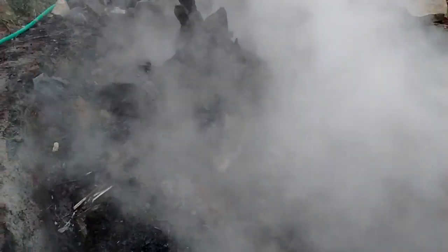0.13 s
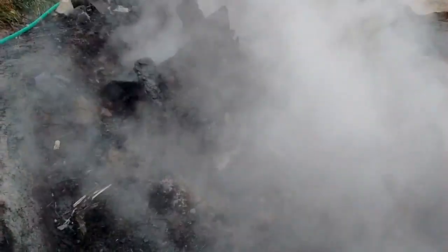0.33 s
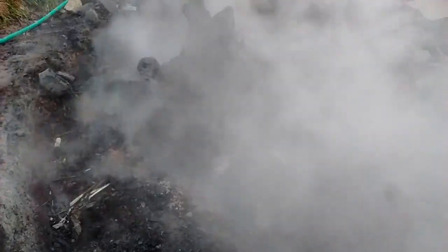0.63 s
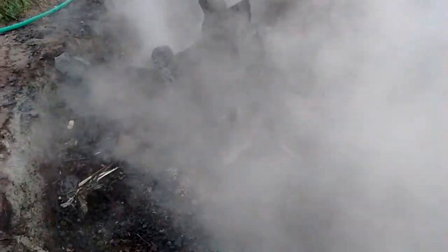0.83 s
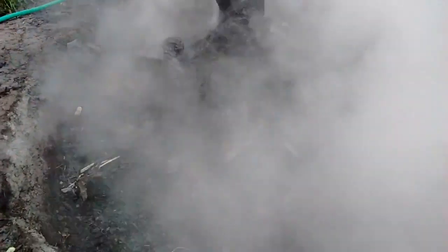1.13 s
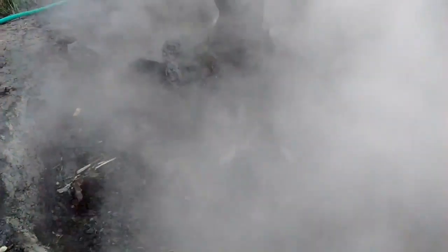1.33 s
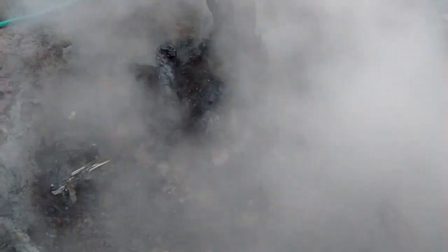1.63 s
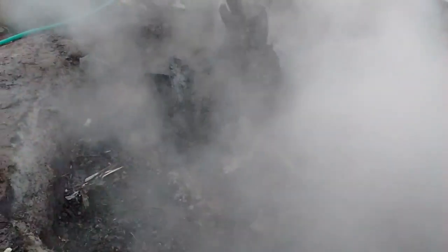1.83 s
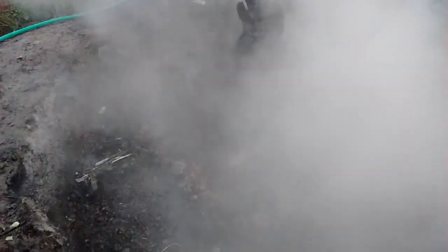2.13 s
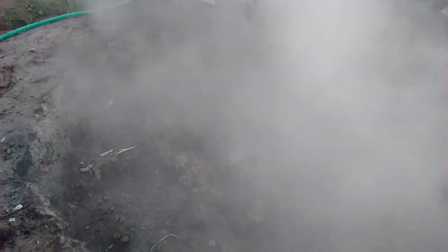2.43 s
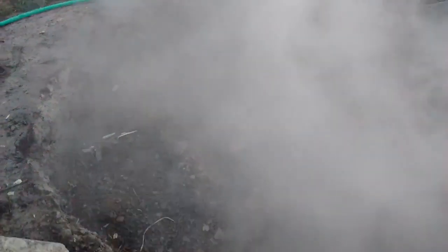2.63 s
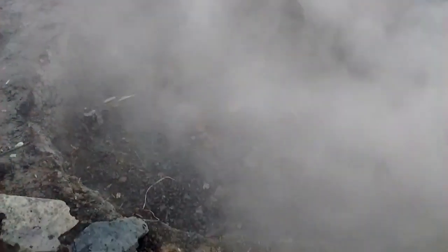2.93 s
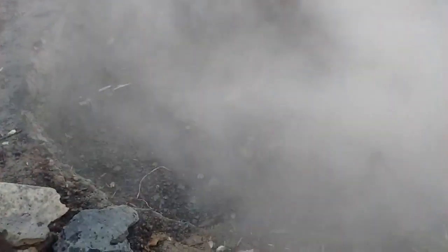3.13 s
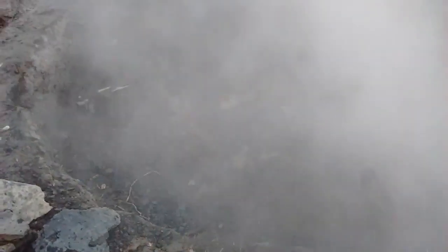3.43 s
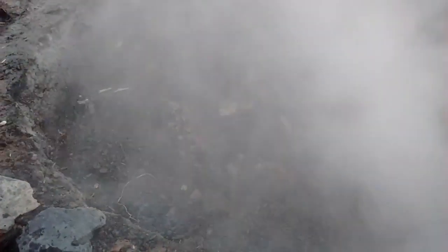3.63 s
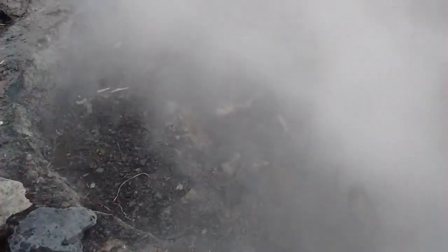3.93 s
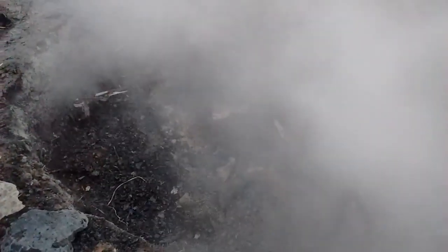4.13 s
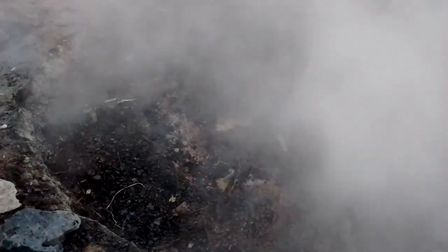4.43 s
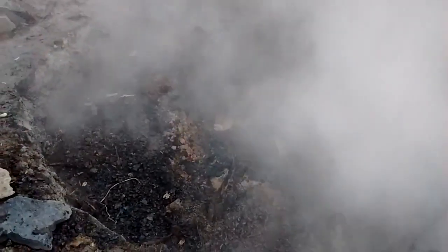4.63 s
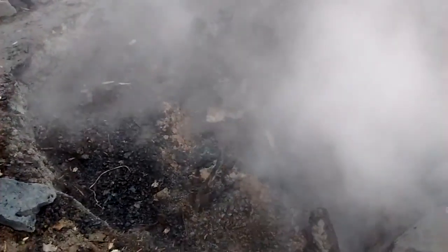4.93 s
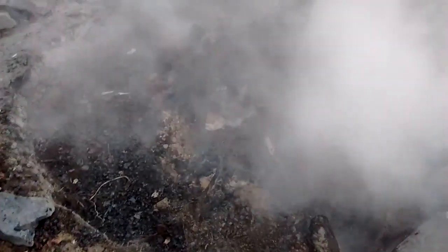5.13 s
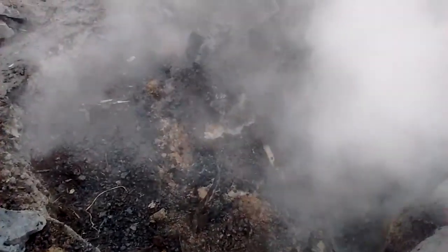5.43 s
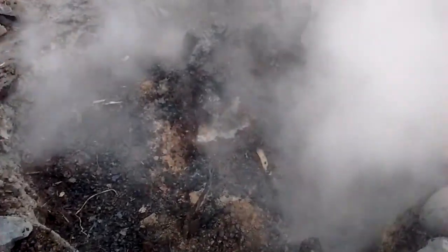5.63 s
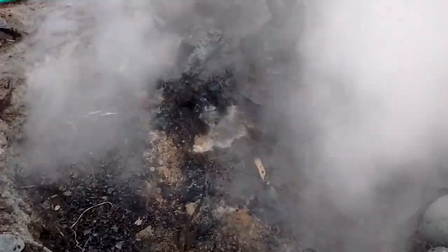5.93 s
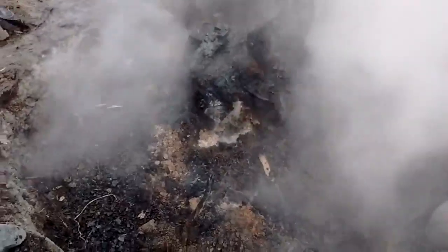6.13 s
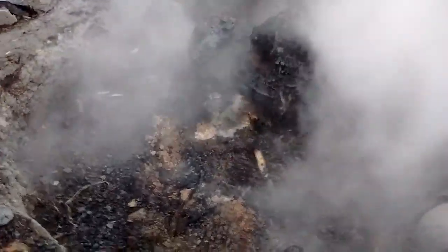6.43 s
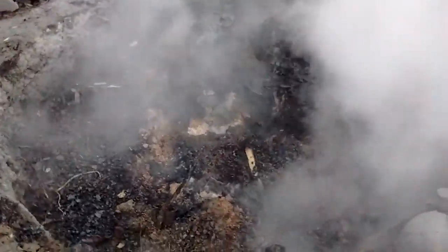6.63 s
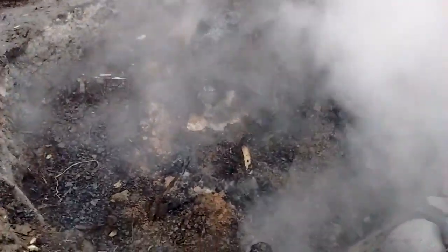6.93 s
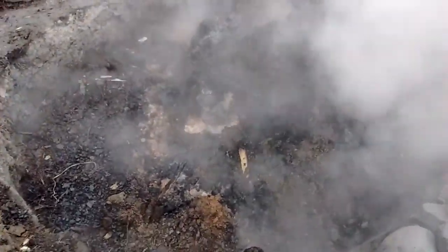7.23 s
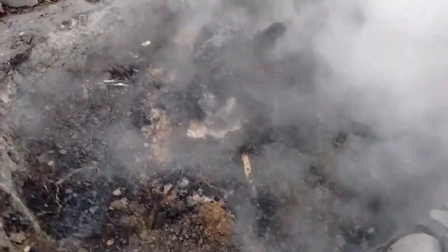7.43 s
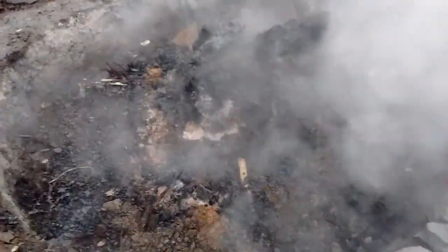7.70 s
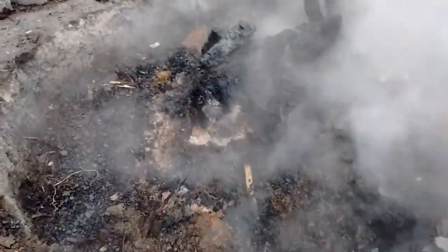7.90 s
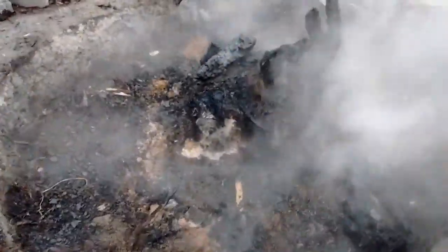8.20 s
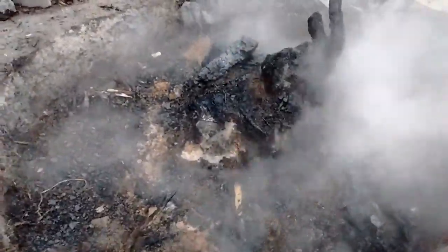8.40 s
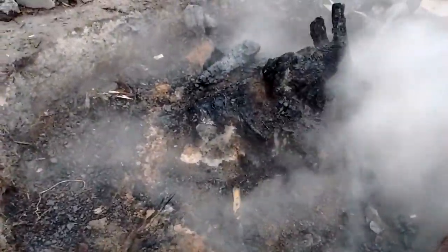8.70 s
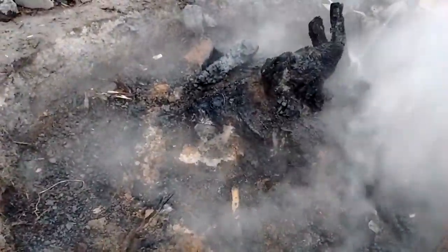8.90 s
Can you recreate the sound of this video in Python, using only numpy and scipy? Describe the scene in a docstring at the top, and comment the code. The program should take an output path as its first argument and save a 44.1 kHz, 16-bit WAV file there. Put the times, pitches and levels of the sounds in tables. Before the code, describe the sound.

Steam hisses continuously as a jet of water sweeps over smouldering wood, surging in short spurts with tiny crackles and pops. Boiling water rumbles underneath. Gusts thump the hand-held microphone in the open air, mostly on the left and mainly in the first half, while the char whistles faintly. A dull drone passes briefly, then the sizzling swells slightly with a few more spits.

```python
"""A hose jet sweeps over hot charred wood and flashes into hissing, spitting steam above a low boiling rumble.
A cavity in the char whistles faintly, and a dull drone comes and goes in the rumble.
Heard outdoors from a hand-held camera: wind buffets and thumps its two microphone ports, and its gain
control ducks after loud thumps. Each channel takes its own port minus a delayed share of the other,
which combs and widens the stereo."""
import sys
import numpy as np
from scipy import signal
from scipy.fft import rfft, irfft, next_fast_len
from scipy.io import wavfile
from scipy.ndimage import uniform_filter1d

SR = 44100
rng = np.random.default_rng(int(sys.argv[2]) if len(sys.argv) > 2 else 0)


def pcm_store(signal):
    """Save signal as 16-bit PCM."""
    levels = np.round(np.clip(np.atleast_2d(signal), -1, 1) * 32767)
    wavfile.write(sys.argv[1], SR, levels.astype(np.int16).T)


N = 399546


def gain_of(db):
    """Decibels to a factor."""
    return 10 ** (np.asarray(db) / 20)


def unit_rms(x):
    """Scales to rms 1."""
    return x / np.sqrt(np.mean(abs(x) ** 2) + 1e-20)


def at_hz(table, hz):
    """Columns of a spectrum table at the given frequencies."""
    f, *columns = np.transpose(table)
    return np.array([np.interp(np.log(hz + 1), np.log(f + 1), c) for c in columns])


def at_time(table, t):
    """Columns of a curve table at the given times."""
    s, *columns = np.transpose(table)
    return np.array([np.interp(t, s, c) for c in columns])


def coloured(spectrum):
    """Steady noise with the given spectrum, at rms 1."""
    size = next_fast_len(N)
    colour = gain_of(at_hz(spectrum, np.fft.rfftfreq(size, 1 / SR))[0])
    return unit_rms(irfft(rfft(rng.standard_normal(N), size) * colour, size)[:N])


def wander(samples):
    """Slow random drift at rms 1, smoothed twice over that many samples."""
    return unit_rms(uniform_filter1d(uniform_filter1d(rng.standard_normal(N), samples), samples))


def mottle(shape, bins, frames):
    """Random patches over frequency and time, at rms 1."""
    across = uniform_filter1d(rng.standard_normal(shape), bins, axis=0)
    return unit_rms(uniform_filter1d(across, frames, axis=1))


def spell(start, length, fade_s):
    """Fades in before the start, holds for the length, then fades out."""
    t = np.arange(N) / SR
    return np.clip(np.minimum(t - start, start + length - t) / fade_s + 1, 0, 1) ** 2


def fuzzy_tone(spells, width_hz, fade_s, waver_hz):
    """Noise in a narrow, wavering resonance that sounds in spells."""
    pole = np.exp(-np.pi * width_hz / SR)
    noise = rng.standard_normal(N) + 1j * rng.standard_normal(N)
    narrow = unit_rms(signal.lfilter([1], np.convolve([1, -pole], [1, -pole]), noise))
    narrow *= np.exp(2j * np.pi * np.cumsum(waver_hz * wander(samples=3000)) / SR)
    envelope, phase, t = np.sqrt(2) * abs(narrow), np.angle(narrow), np.arange(N) / SR
    return sum(gain_of(db) * spell(s, length, fade_s) * envelope * np.cos(phase + 2 * np.pi * hz * t)
               for s, length, hz, db in spells)


def on_ports(sound, right):
    """Whole on the left port, scaled on the right; a negative share is in opposite phase."""
    return sound * np.array([[1], [right]])


def add_centred(mix, s, sound):
    """Mixes a sound in, centred on a time."""
    start = max(round(s * SR) - sound.shape[1] // 2, 0)
    part = mix[:, start:start + sound.shape[1]]
    part += sound[:, :part.shape[1]]


# Three spots on the wood, as heard from the camera. Each row: frequency in Hz, left and right port
# spectrum in relative dB, likeness of the ports in phase, and their likeness a quarter cycle apart.
FIRST_SPOT = [(350, -6.5, -7, -0.91, -0.037), (597, -5, -8.5, -0.89, 0.37), (1230, -6, -11.5, -0.62, 0.31),
              (1880, -3.5, -5.5, -0.84, 0.51), (2630, -3.5, -9, -0.21, 0.22), (3000, -2.5, -6.5, -0.27, .2),
              (3930, -2.5, -7.5, -0.62, 0.22), (5300, -8.5, -9, -0.51, 0.54), (5750, -11, -8, -.4, 0.69),
              (6200, -15, -8.5, -0.41, 0.56), (8100, -5.5, -4.5, -0.41, -0.14),
              (10240, -9, -9, 0.088, 0.37), (11500, -11, -19, 0.092, 0.02), (13100, -14, -26, -0.03, 0.05),
              (15400, -12, -31, -0.81, 0.09), (16100, -28, -20, 0.44, 0.03)]
SECOND_SPOT = [(350, -9.5, -11.5, -0.92, -0.42), (643, -3, -7, -0.98, 0.42),
               (1200, -8.5, -13, -0.74, -0.18), (1670, -5.5, -7.5, -0.94, 0.12),
               (2410, -1, -4.5, -0.71, 0.17), (3170, -10.5, -2.5, -0.86, -1.33),
               (4370, -9.5, -10.5, -0.55, -0.83), (5500, -10.5, -19, -0.34, -0.87),
               (8200, -12.5, -9, 0.011, -0.27), (10500, -13.5, -16, -0.04, 0.14),
               (11550, -16, -23, -0.056, -0.09), (13100, -19, -32, -0.05, -0.01),
               (15200, -19, -37, 0.21, 0.01), (16500, -21.5, -28, 0.71, -0.01)]
THIRD_SPOT = [(360, -12.5, -11, -0.86, -0.31), (594, -8, -10, -0.85, -0.053),
              (1150, -7.5, -10.5, -0.71, -0.47), (1810, -7.5, -8.5, -0.76, -0.25),
              (2150, -2.5, -6, -0.68, -0.39), (2400, -5.5, -9, 0.21, -0.1), (2940, -7, -9, 0.48, -0.68),
              (3200, -5.5, -7.5, 0.48, -0.77), (3850, -10.5, -6, 0.39, -1.4), (4460, -8, -7.5, .3, -.35),
              (5370, -7.5, -11, 0.62, -0.08), (7900, -7, -3.5, 0.022, 0.18),
              (8600, -7.5, -1.5, -0.087, 0.32), (9700, -7.5, -6, 0.1, 0.36),
              (11500, -9, -14.5, 0.11, -0.03), (13000, -12, -24.7, -0.05, 0.08),
              (14600, -10.5, -31, -0.07, 0.01), (16100, -10, -27.1, -0.052, -0.08)]
# The jet's path over the wood. Each row: time in seconds, position from 0 (first spot) to 2 (third).
JET_PATH = [(0, 0.09), (2.0, 0.046), (5, 0.99), (6.1, 1.25), (6.5, 1.89), (9.06, 2.01)]


def spot_colour(hz, t):
    """Each spot colours the hiss its own way, and the sweeping jet blends one into the next."""
    aim = np.clip(at_time(JET_PATH, t)[0], 0, 2)
    weights = np.maximum(1 - abs(aim - np.arange(3)[:, None]), 0)
    spots = np.array([at_hz(spot, hz) for spot in (FIRST_SPOT, SECOND_SPOT, THIRD_SPOT)])
    left_treble = (gain_of(spots[:, :1, hz > 3500]) ** 2).sum(2, keepdims=True) / len(hz)
    spots[:, :2] -= 10 * np.log10(left_treble)  # all spots equally loud in the left port's treble
    left_db, right_db, in_phase, quarter = np.einsum("kcf,kt->cft", spots, weights)
    likeness = in_phase + 1j * quarter
    likeness /= np.maximum(abs(likeness) / .99, 1)
    return left_db, right_db, likeness


# The jet on the char. Each row: time in seconds, hiss level in dB, boiling and splash boosts in dB.
JET_LEVELS = [(0.0, -30.5, -3, 1), (0.45, -29.5, 0, -1), (0.78, -32.5, -4.5, 3), (0.91, -30, -3, -2.5),
              (1.24, -31, -2, -0.5), (1.92, -31, 1.5, 1.5), (2.5, -34.5, 0, 4), (2.95, -35, -1.5, 3),
              (3.15, -32.5, -0.5, 0), (3.4, -32.5, -0.5, 4), (3.7, -31.5, -1, 0), (4.1, -32.5, -2.5, 0),
              (4.41, -30, -4.5, -2), (4.85, -32, -6.5, -1), (5.3, -31.5, -4.5, 1), (5.8, -31, -3.5, 2),
              (6.23, -31.5, -3, 3), (6.58, -27.5, 2.5, -1), (6.82, -31.5, 2.5, 2), (7.06, -26.5, 3.5, -2),
              (7.2, -30, 0, -1.5), (7.4, -28, 0, -1.5), (7.75, -29, 5.5, 3.5), (7.85, -28.5, 6, 6.5),
              (7.92, -27.5, 0, -2.5), (8.13, -31, 5.5, 2.5), (8.38, -28.5, 2.5, 2), (8.7, -28, 3, -2.5),
              (8.9, -28.5, 1.5, -5.5), (9.06, -28.5, 1.5, -4.5)]
# Spurts: the jet hits a fresh hot patch and one region of the hiss swells. Each row: peak time in
# seconds, boost in dB (negative for a dip), centre in Hz, length in milliseconds.
HOT_PATCH_SPURTS = [(0.038, 6.5, 4700, 31), (0.28, 9, 980, 330), (.21, 9.5, 2850, 50),
                    (0.524, 11, 2700, 45), (0.835, 12, 2800, 79), (1.05, 6, 2400, 37), (1.14, 11, 2330, 33),
                    (1.32, 4.5, 3100, 79), (1.56, 5.5, 2900, 94), (1.84, 7, 2000, 51), (2.16, 8, 1060, 23),
                    (5.25, 8, 2700, 120), (5.82, 6, 494, 73), (5.899, 9, 440, 40), (6.04, 10, 440, 58),
                    (5.7, 7, 330, 42), (7.84, 3, 1100, 99), (8.25, 6.5, 1840, 73), (8.63, 10.5, 2060, 140),
                    (8.63, 7, 790, 120), (8.715, 4, 1910, 8.4), (7.91, 7, 4100, 24), (5.85, 5.5, 3240, 820),
                    (5.1, 2.5, 3400, 180), (6.42, 3, 4040, 220), (7.03, 0, 2500, 110),
                    (4.9, 2.5, 2570, 500), (2.66, 3, 3400, 230), (12, 3, 3300, 220), (6.5, 2.5, 1800, 130),
                    (6.45, 2.5, 5600, 300), (7.86, 6, 2000, 51), (8.05, 4.5, 2000, 70), (3.1, -9, 1660, 50),
                    (9.3, 4, 630, 80)]


def jet_level_db(hz, t):
    """Level over frequency and time as the water boils, splashes, spurts and sputters."""
    def region(centre_hz, log_width):
        return np.exp(-.5 * (np.log((hz + 1) / centre_hz) / log_width) ** 2)[:, None]

    boiling, splash = region(2760, 0.26), region(360, 1)
    patches = mottle((len(hz), len(t)), bins=4, frames=45)
    sputter = mottle((len(hz), len(t)), bins=9, frames=8)
    flicker = unit_rms(uniform_filter1d(rng.standard_normal(len(t)), size=6))  # drops land in bursts
    hiss_db, boil_db, splash_db = at_time(JET_LEVELS, t)
    level_db = hiss_db + boil_db * boiling + splash_db * splash
    s, db, centre_hz, ms = np.transpose(HOT_PATCH_SPURTS)[:, :, None]
    spurt_regions = region(centre_hz, 0.29 * (52 / ms) ** 0.59)[:, 0].T  # long swells are narrower
    reach_s = ms / 1000 * np.where(t < s, .55, 1.2)  # quick rise, slower fall
    swells_db = db * np.exp(-2 * ((t - s) / reach_s) ** 2)
    level_db += spurt_regions @ swells_db * (1 + 0.2 * flicker)  # landing drops break a spurt up
    level_db += (1.22 + 0.43 * boiling) * patches + 0.5 * flicker + 1.7 * region(3000, 0.7) * sputter
    return level_db - 24 * np.maximum(np.log2(300 / (hz + 1)), 0)[:, None]  # no hiss in the deep bass


def steam(crackle_per_s=900, crackle_db=-9):
    """Water flashes to steam on the hot wood: a dense hiss with tiny random spits in it."""
    ticks = gain_of(4.3 * np.minimum(rng.exponential(1, (2, N)), 4))
    ticks *= rng.random((2, N)) < crackle_per_s / SR
    ticks *= rng.choice([-1., 1.], (2, N))
    hiss = rng.standard_normal((2, N)) + gain_of(crackle_db) * unit_rms(ticks)
    hz, t, (left, unrelated) = signal.stft(hiss, SR, nperseg=512, noverlap=384)
    left_db, right_db, likeness = spot_colour(hz, t)
    right = likeness * left + np.sqrt(1 - abs(likeness) ** 2) * unrelated
    ports = np.array([left * gain_of(left_db), right * gain_of(right_db)]) * gain_of(jet_level_db(hz, t))
    return signal.istft(ports, SR, nperseg=512, noverlap=384)[1][:, :N]


# The boiling's low end at the microphone. Each row: frequency in Hz, spectrum level in relative dB.
BOIL_SPECTRUM = [(15, -20), (40, -9.5), (85, 1.5), (108, -0.5), (138, 0.5), (168, -4.5), (200, -4.5),
                 (280, -13.5), (420, -34), (800, -58)]
# Its slow rise and fall. Each row: time in seconds, level in dB.
BOIL_LEVELS = [(0, -31), (2, -33), (3.6, -32.5), (6, -33.5), (7, -36.5), (7.9, -34), (8.3, -34),
               (9.06, -39)]
RUMBLE_RIGHT = -0.59  # the rumble reaches the right port weaker and in opposite phase


def boiling_rumble():
    """Boiling water rumbles unevenly on both ports, with a little unrelated rumble on the right."""
    level_db = at_time(BOIL_LEVELS, np.arange(N) / SR)[0]
    rumble = coloured(BOIL_SPECTRUM) * gain_of(level_db + 2.5 * wander(samples=500))
    ports = on_ports(rumble, right=RUMBLE_RIGHT)
    ports[1] += 0.19 * coloured(BOIL_SPECTRUM) * gain_of(level_db)
    return ports


# Wind right on the microphone. Each row: frequency in Hz, spectrum level in relative dB.
WIND_SPECTRUM = [(15, -20), (40, 7), (80, 5), (140, -2.5), (200, -8.5), (300, -20.5), (500, -39),
                 (900, -34)]
# Gusts on the left port. Each row: start in seconds, length in seconds, level in dB.
WIND_GUSTS = [(0, 0.21, -44), (.85, 0.62, -43), (2.18, 0.69, -33.5), (2.29, 0.15, -33), (2.9, 0.58, -30.5),
              (3.56, 0.43, -30), (4.046, 0.28, -38), (5.2, 0.32, -53), (6.548, 0.51, -41), (7.6, 0.17, -48)]


def wind(breeze_db=-53.5):
    """A light breeze and stronger gusts buffet the left port."""
    gusts = sum(gain_of(db) * spell(s, length, fade_s=0.091) for s, length, db in WIND_GUSTS)
    buffeting = coloured(WIND_SPECTRUM) * gain_of(4.5 * wander(samples=350))
    return on_ports(buffeting * (gain_of(breeze_db) + gusts), right=0)


# Eddies striking the microphone. Each row: centre time in seconds, left port envelope peak in dB,
# length in milliseconds, snap from 0 (soft) to 1 (abrupt), swing in Hz.
EDDY_THUMPS = [(.081, -26.5, 6, 0.1, 90), (2.143, -13, 4.9, 0.16, 110), (2.172, -16, 5.8, 0.22, 180),
               (2.194, -9.5, 8.2, 0.24, 140), (2.222, -22, 4, 0.15, 220), (2.238, -18, 6.5, 0.06, 120),
               (2.291, -10.5, 5.9, 0.1, 95), (2.314, -10.5, 6.9, 0.1, 95), (2.338, -10, 11, 0.3, 98),
               (2.358, -11, 4.6, 0.2, 125), (2.385, -17, 8, 0, 110), (2.406, -14, 8.1, 0, 130),
               (2.43, -15, 12, 0, 60), (2.471, -18, 5.7, 0, 121), (2.503, -12.5, 7, 0, 144),
               (2.545, -15, 4.9, 0, 145), (2.562, -12, 9.6, 0.06, 95), (2.598, -20, 5.5, 0.03, 150),
               (2.62, -7.5, 6.8, 0.05, 133), (2.715, -15, 7, 0, 110), (2.745, -5.5, 8.9, 0.24, 147),
               (2.777, -12, 9.2, 0.1, 75), (2.815, -17, 7, 0, 110), (2.828, -17, 5, 0.2, 170),
               (2.86, -21, 6, .1, 130), (2.884, -15, 5, .1, 120), (2.898, -15, 7, 0.15, 190),
               (2.95, -21, 12, 0, 100), (2.994, -9, 5, 0.1, 153), (3.033, -21, 5, .1, 150),
               (3.054, -11, 4.1, 0.1, 120), (3.069, -16.5, 8, 0, 80), (3.125, -23, 6, 0, 110),
               (3.177, -2, 9.5, 0.6, 109), (3.218, -7.5, 17, 0, 90), (3.268, -18, 7, 0, 90),
               (3.338, -17, 7, 0, 90), (3.45, -14, 9.1, 0, 70), (3.54, -16, 5.8, 0.26, 130),
               (3.572, -16, 8, 0.1, 120), (3.666, -16.5, 7.4, 0.3, 80), (3.695, -11, 10, .1, 110),
               (3.738, -12, 5.2, 0.3, 100), (3.765, -7.5, 10.4, 0.04, 84), (3.79, -10, 7.6, 0.12, 140),
               (3.935, -10, 5.5, 0.18, 100), (4.11, -15, 12, 0.2, 97), (4.271, -18, 7.6, 0.1, 89.5),
               (4.35, -21, 6.5, 0.1, 100), (4.468, -15.5, 6.9, 0.14, 108), (6.706, -8.5, 3.7, 0.22, 113),
               (7.053, -15.5, 6.9, 0.15, 95), (8.287, -16, 25, 0.1, 97), (8.369, -25, 19, 0.1, 120)]


def wind_thumps():
    """Each eddy shoves the membrane, more or less abruptly, either way, and it swings a few times."""
    out, t = np.zeros((2, N)), (np.arange(4000) - 2000) / SR
    for (s, db, ms, snap, hz), phase in zip(EDDY_THUMPS, rng.random(len(EDDY_THUMPS))):
        reach_s = ms / 1000 * np.where(t < 0, 1 - .8 * snap, 1 + .4 * snap)
        turns = phase + hz * (t + snap * 0.0021 * np.tanh(t / 0.0006))  # quicker around the snap
        thump = gain_of(db) * np.exp(-1.3 * (t / reach_s) ** 2) * np.cos(2 * np.pi * turns)
        add_centred(out, s, on_ports(thump, right=-ms / 42.5))  # longer ones push the right port more
    return out


# Sharp spits off the wood. Each row: centre time in seconds, level in dB, pitch in Hz.
STEAM_SPITS = [(0.119, -20, 2590), (0.207, -20, 3020), (0.443, -17.5, 3000), (1.139, -20, 2820),
               (1.737, -17, 2780), (1.842, -13, 2200), (5.498, -28, 3950), (6.219, -22, 3000),
               (7.08, -25, 3020), (7.87, -26, 7950), (7.94, -28, 7900), (8.05, -20, 9200),
               (8.093, -24, 9100), (8.721, -26, 2500)]


def spits(decay_s=.002):
    """Steam spits in short noisy pops, each around one pitch."""
    out, t = np.zeros((2, N)), (np.arange(600) - 300) / SR
    for s, db, hz in STEAM_SPITS:
        band = signal.butter(1, [hz * .7, hz * 1.4], "band", fs=SR, output="sos")
        noise = unit_rms(signal.sosfilt(band, rng.standard_normal(len(t))))
        pop = gain_of(db) * noise * np.exp(-abs(t) / decay_s)
        add_centred(out, s, on_ports(pop, right=-.45))
    return out


# Whistles from the char, mostly on the left port.
# Each row: start in seconds, length in seconds, pitch in Hz, level in dB.
CAVITY_WHISTLES = [(1.85, 0.31, 1640, -39.5), (2.15, 0.37, 1658, -37), (2.53, .22, 1648, -37.5),
                   (3.08, 0.1, 1606, -42), (3.3, 0.36, 1600, -39), (7.5, 0.89, 1520, -43),
                   (8.57, 0.12, 1517, -40)]


def cavity_whistle():
    """A cavity in the char whistles faintly, breathy and unsteady."""
    tone = fuzzy_tone(CAVITY_WHISTLES, width_hz=150, fade_s=0.035, waver_hz=35)
    return on_ports(tone * gain_of(2.3 * wander(samples=300)), right=-.2)


# Low tones under the hiss. Each row: start in seconds, length in seconds, pitch in Hz, level in dB.
DRONE_SPELLS = [(4.76, 0.21, 135.4, -26.5), (4.85, 0.23, 85, -35), (5.2, 0.2, 137.4, -34.5),
                (5.52, 0.46, 140.1, -31), (6.1, 0.44, 141.6, -37)]


def drone():
    """A dull drone comes and goes in the boiling rumble."""
    return on_ports(fuzzy_tone(DRONE_SPELLS, width_hz=16.4, fade_s=.08, waver_hz=1.4), right=RUMBLE_RIGHT)


def scene():
    """Everything that reaches the two microphone ports in the open air."""
    from_wood = steam() + spits() + cavity_whistle() + boiling_rumble() + drone()
    return from_wood + wind() + wind_thumps()


# The camera's stereo widening. Each row: frequency in Hz, share of the right port taken from the left
# channel, share of the left port taken from the right channel, delay in samples.
STEREO_WIDENING = [(100, 0.45, 0.51, 14.1), (3040, 0.8, 0.54, 14.38), (4600, 0.69, 0.44, 14.17),
                   (8000, 0.67, 0.31, 13.8), (8600, 0.6, .3, 13.7), (9150, 0.26, 0.26, 13.8),
                   (11200, .01, .1, 15.3), (13800, .01, 0.2, 15.5), (15500, .01, 0.092, 19)]
DUCK_ABOVE_DB, RECOVERY_DB_PER_S, TREBLE_LIMIT_HZ = -16.5, 7, 15490


def record(dry):
    """The camera cross-subtracts its ports, ducks after loud peaks and cuts the highest treble."""
    size = next_fast_len(N)
    hz = np.fft.rfftfreq(size, 1 / SR)
    to_left, to_right, delay = at_hz(STEREO_WIDENING, hz)
    late = np.exp(-2j * np.pi * hz * delay / SR)
    left, right = rfft(dry, size)
    wide = irfft([left - to_left * late * right, right - to_right * late * left], size)[:, :N]
    power_db = 10 * np.log10(abs(uniform_filter1d((wide ** 2).mean(0), size=500)) + 1e-12)
    fall_db = np.arange(N) * RECOVERY_DB_PER_S / SR
    held_db = np.maximum.accumulate(power_db + fall_db) - fall_db  # jumps to a peak, then sinks steadily
    over_db = np.maximum(held_db - DUCK_ABOVE_DB, 0)
    ducked = wide / gain_of(uniform_filter1d(over_db, size=300))
    lowpass = signal.firwin(3001, TREBLE_LIMIT_HZ, window=("kaiser", 10), fs=SR)
    return signal.oaconvolve(ducked, lowpass[None], "same")


dry = scene()
out = record(dry)
pcm_store(out)
```